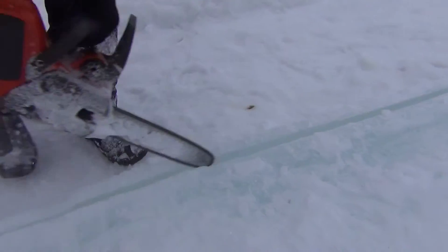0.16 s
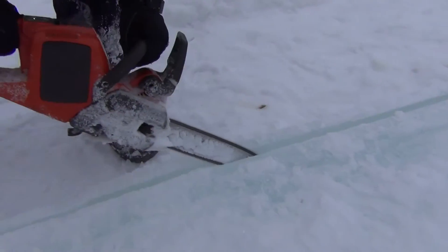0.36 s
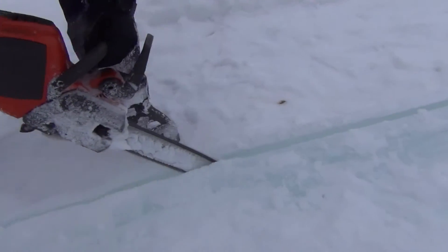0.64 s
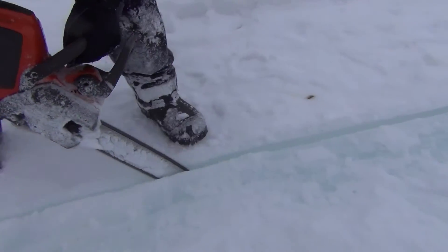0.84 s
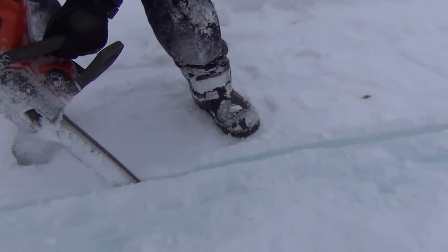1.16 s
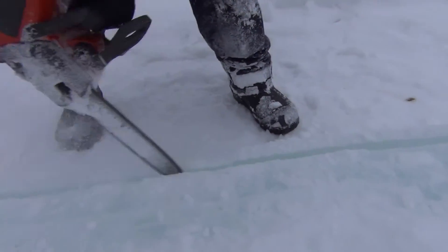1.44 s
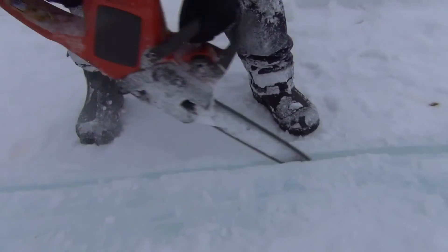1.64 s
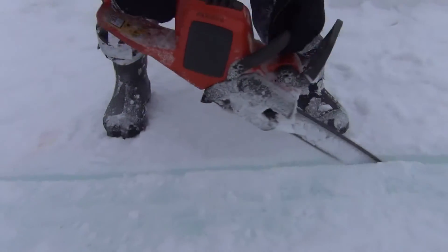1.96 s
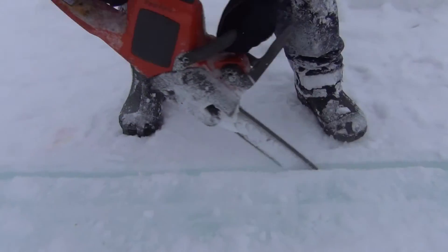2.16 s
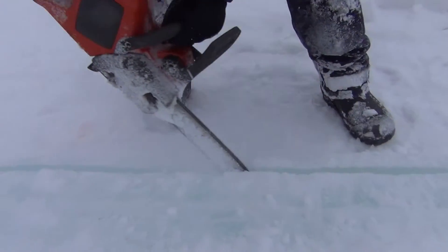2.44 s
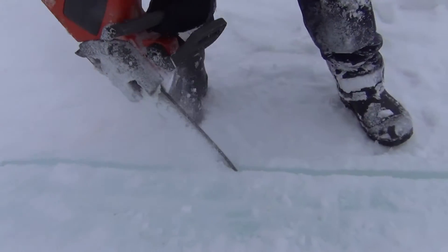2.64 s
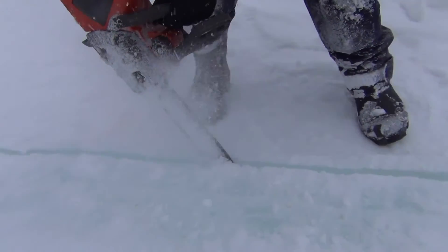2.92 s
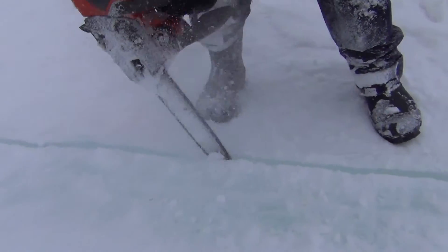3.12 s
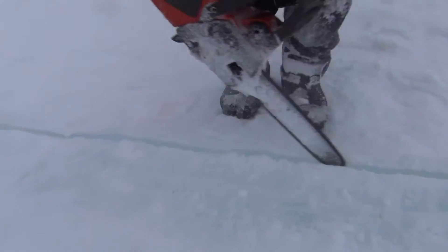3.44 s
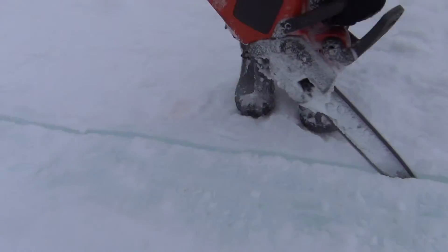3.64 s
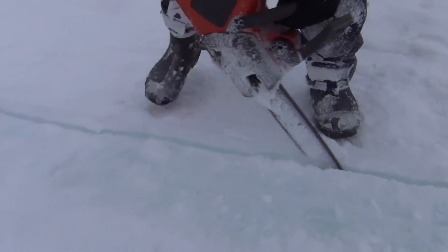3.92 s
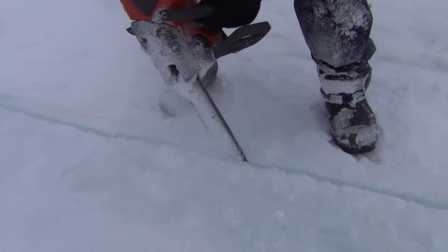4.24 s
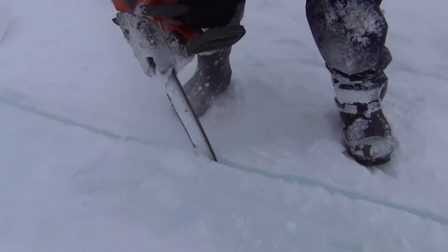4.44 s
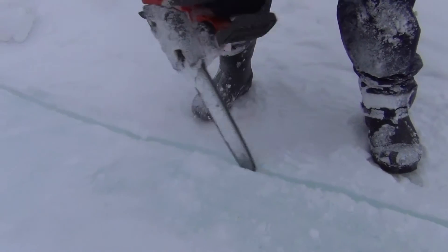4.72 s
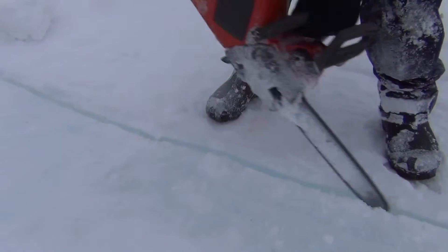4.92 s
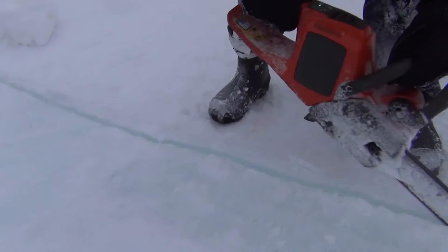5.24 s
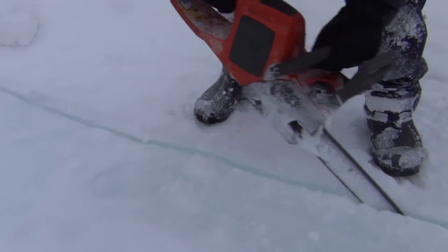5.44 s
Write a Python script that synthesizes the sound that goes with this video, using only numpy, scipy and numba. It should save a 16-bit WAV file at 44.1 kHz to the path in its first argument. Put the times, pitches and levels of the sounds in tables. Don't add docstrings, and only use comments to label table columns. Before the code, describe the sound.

Outdoors on snowy ice, a saw chain screams continuously while its cutters rasp through a slot. The bar hums more strongly in bites, chips spray as crackling hiss, and a few dull knocks are buried in the roar. Soft wind thumps hit the nearby stereo camera microphone; the sound is dry, bright and nearly central.

```python
import sys
import numpy as np
from scipy import signal
from scipy.fft import rfft, irfft
from scipy.io import wavfile
from scipy.ndimage import uniform_filter1d, map_coordinates
from numba import njit

SR = 44100
rng = np.random.default_rng(int(sys.argv[2]) if len(sys.argv) > 2 else 0)


def voltage_ratio(decibels):
    exponent = np.asarray(decibels, float) / 20
    return 10 ** exponent


def to_wav(sig):
    pcm = np.clip(np.atleast_2d(sig), -1, 1) * 32767
    pcm = np.round(pcm).astype(np.int16)
    wavfile.write(sys.argv[1], SR, pcm.T)


N = 245637
STRIKES_PER_TURN = 12


def level(x, db):
    return x * voltage_ratio(db) / np.sqrt(np.mean(x ** 2))


def columns(table):
    s, *rest = np.transpose(table)
    return [np.interp(np.arange(N) / SR, s, c) for c in rest]


def holds(table):
    attack_s, release_s = 0.063, 0.038
    t = np.arange(N) / SR
    lifts = []
    for start_s, length_s, lift_db in table:
        rise = (t - start_s) / attack_s + 0.5
        fall = (start_s + length_s - t) / release_s + 0.5
        lifts.append(lift_db * np.clip(np.minimum(rise, fall), 0, 1))
    return np.max(lifts, axis=0)


def swing(x):
    return x - x.mean()


def glide(x):
    glide_s = 0.13
    return uniform_filter1d(x, int(glide_s * SR))


def walk(rate_hz):
    k = int(SR / rate_hz)
    steps = np.repeat(rng.standard_normal(N // k + 1), k)
    return 1.3 * uniform_filter1d(uniform_filter1d(steps, k), k)[:N]


def colour(x, shape):
    hz, db = np.transpose(shape)
    f = np.maximum(np.arange(N // 2 + 1) * SR / N, 1)
    return irfft(rfft(x) * voltage_ratio(np.interp(np.log(f), np.log(hz), db)), N)


@njit
def svf(x, hz, width_hz):
    y, band, low = np.empty(len(x)), 0., 0.
    for i in range(len(x)):
        g, k = np.tan(np.pi * hz[i] / SR), width_hz / hz[i]
        v = (band + g * (x[i] - low)) / (1 + g * (g + k))
        band, low, y[i] = 2 * v - band, low + 2 * g * v, k * v
    return y


def ring(x, hz, width_hz):
    centre = hz * np.ones(N)
    return svf(svf(x, centre, 1. * width_hz), centre, 1. * width_hz)


def late(x, delay_s):
    return map_coordinates(x, [np.arange(N) - delay_s * SR], order=3, mode="mirror")


def puffs(table, width_s):
    t = np.arange(N) / SR
    return sum(voltage_ratio(db) * np.exp(-((t - s) / width_s) ** 2) for s, db in table)


# hz, density_db
WIND_SHAPE = [(8.8, -29), (15, 6.5), (44, 9.5), (189, -1.5), (228, -4.5), (265, -12), (300, -5), (390, -12),
              (660, -120)]
# start_s, length_s, lift_db
GUSTS = [(0, 0.89, 3.5), (1.05, .14, 1), (1.29, 0.32, 3), (1.9, 0.32, 3.5), (2.35, .23, 3),
         (2.72, 0.082, 3), (2.98, 0.56, 3.5), (3.7, 0.12, 4), (3.96, 0.68, 4), (4.73, .35, 3),
         (5.3, .35, 3)]
# time_s, peak_db
PUFFS = [
    (0.324, -41),
    (0.864, -45),
    (2.529, -66),
    (2.747, -39),
    (3.061, -43),
    (3.993, -44),
    (4.069, -47),
    (4.392, -39),
    (4.619, -63.5),
    (5.411, -39),
]
# time_s, peak_db
CROSS_PUFFS = [(.078, -54), (.328, -46), (.529, -46), (1.126, -56), (1.301, -51), (2.046, -55),
               (2.664, -54), (2.877, -56), (2.997, -49), (3.341, -52), (3.464, -50), (3.884, -55),
               (4.395, -46), (5.35, -54), (5.417, -49), (5.485, -54)]


def wind():
    gust = voltage_ratio(-64.5 + holds(GUSTS) - 0.5 * walk(5.08) + 0.82 * walk(26.74))
    mid, side = (gust * level(colour(rng.standard_normal(N), WIND_SHAPE), 0) for _ in range(2))
    mid = mid + voltage_ratio(-3.0) * late(puffs(PUFFS, width_s=0.001), 0.0032)
    side = side + voltage_ratio(11) * puffs(CROSS_PUFFS, width_s=0.0012)
    return mid * voltage_ratio(np.array([[1.1], [-1.1]])) + 0.27 * side * np.array([[1], [-1]])


# time_s, strike_hz
SPEED = [(0.0, 940), (0.6, 927), (1.1, 942), (1.32, 927), (1.43, 957), (1.86, 919), (2.29, 920),
         (2.39, 936), (2.64, 916.6), (2.65, 934.6), (3.1, 934.5), (3.16, 954), (3.27, 911.6), (4.0, 918.7),
         (4.03, 914), (4.34, 927.3), (5.2, 930.7), (5.57, 916)]
# free_s, drag_s, sag_hz
SNAGS = [
    (.66, 0.096, 6.2),
    (1.18, 0.054, 8.8),
    (2.29, .1, 7.1),
    (3.96, 0.036, 9.7),
    (4.12, 0.09, 9.3),
    (4.21, 0.0501, 16),
    (4.63, 0.15, 11.5),
    (4.88, 0.11, 8.1),
    (5.38, 0.048, 8.5),
]


def chain_speed():
    spring_s, overshoot, wander_hz = 0.04026, 0.807, 1.497
    t = np.arange(N) / SR
    snags = np.zeros(N)
    for free_s, drag_s, sag_hz in SNAGS:
        sag = -np.clip(1 - (free_s - t) / drag_s, 0, 1)
        rebound = overshoot * np.exp(-np.abs(t - free_s) / spring_s)
        snags += sag_hz * np.where(t < free_s, sag, rebound)
    return columns(SPEED)[0] + uniform_filter1d(snags, size=800) + wander_hz * walk(14)


def chopped(turns, depth, flicker_db, grit_db):
    gate = 1 + depth * np.cos(2 * np.pi * STRIKES_PER_TURN * turns)
    grit = voltage_ratio(grit_db * walk(150) + flicker_db * walk(11))
    return gate * grit * rng.standard_normal(N)


def partial(turns, multiple, db, wobble, flutter_db):
    angle = 2 * np.pi * multiple * turns + wobble * walk(60)
    return np.sqrt(2) * voltage_ratio(db + flutter_db * walk(45)) * np.sin(angle + 2 * np.pi * rng.random())


def throb(turns, depth_db):
    laps_per_turn = 0.27
    return voltage_ratio(depth_db * np.sin(2 * np.pi * laps_per_turn * turns + 2.7 * walk(8)))


def repeating(x, strike_hz, likeness):
    return x + sum(likeness ** k * late(x, 2 * k / strike_hz) for k in range(1, 4))


# delay_ms, drift_ms, strength_db
BOUNCES = [
    (1.302, 0.192, -15.5),
    (2.9, 0.303, -10.5),
    (5.1, 0.378, -13.5),
]


def bounced(x):
    return x + sum(voltage_ratio(db) * late(x, (ms + drift_ms * walk(2.5)) / 1000) for ms, drift_ms, db in BOUNCES)


# start_s, length_s, depth_db
SHADES = [
    (-.05, 0.93, 6),
    (.75, .5, 5),
    (1.25, .43, 4),
    (2.45, 0.36, 2.5),
    (2.9, .3, -5),
    (3.2, 0.54, 1),
    (3.9, 0.496, -0.5),
    (4.5, 0.31, -5),
    (4.85, 0.36, 3),
]


def shaded(x):
    return x - (1 - voltage_ratio(-holds(SHADES))) * ring(x, hz=4700, width_hz=1300)


# time_s, nearness_db, cover_turn_db, whistle_hz
POSE = [(0.0, -35, -22, 9150), (0.11, -32, -12, 8630), (0.4, -37, -1, 8900), (0.96, -34.5, -3, 8500),
        (1.3, -33, -7.5, 8900), (1.44, -32, -13, 8480), (1.78, -36, 1, 8460), (1.94, -42, 2.5, 8790),
        (2.13, -36.5, 1.5, 8800), (2.59, -32.5, -6, 8750), (3.57, -32.5, -8.5, 8464),
        (3.71, -31.5, -13, 8490), (3.86, -34, -3, 8890), (4.96, -30.5, -14, 8365), (5.18, -33, -18, 8500),
        (5.26, -38, -5.5, 8910), (5.55, -33, -7, 8650), (5.57, -39, 2, 8630)]
# time_s, density_db, fineness_db
SPRAY = [(0.0, -41, -11), (0.42, -39, -6), (0.91, -38, -5.5), (1.18, -41.5, -4), (1.78, -39, -12),
         (1.8, -42, -11), (2.14, -39.5, -11), (2.7, -41, -4), (3.04, -38.5, -11), (3.24, -43.5, -5),
         (3.38, -36.5, -16), (3.4, -42, -6), (3.52, -41.5, -13), (4.58, -39.5, -6.5), (4.75, -42.5, -9),
         (4.89, -42.5, -3), (5.21, -45.5, -9), (5.57, -41, -7)]
# start_s, length_s, lift_db
BURSTS = [
    (.37, .1, 1),
    (.57, 0.098, 2.5),
    (.72, 0.11, 1),
    (.9, 0.087, 2),
    (1.06, 0.054, 3),
    (2.05, 0.15, 2.5),
    (2.48, 0.089, 1),
    (3.33, 0.093, 3),
    (3.6, 0.083, 4),
    (4.25, 0.091, 2),
]
# start_s, length_s, lift_db
SURGES = [
    (.1, 0.14, 1.5),
    (1.36, 0.32, 2),
    (2.88, .1, 0),
    (3.25, 0.42, 0.5),
    (4.3, 0.086, 0.5),
    (4.6, .1, 1.5),
    (4.82, 0.19, 1.5),
    (5.05, 0.14, 0.5),
]


def hiss_controls():
    near_db, turn_db, centre_hz = map(glide, columns(POSE))
    near_db, turn_db = swing(near_db), swing(turn_db)
    chips_db, fine_db = (swing(glide(c)) for c in columns(SPRAY))
    burst_db = holds(BURSTS)
    whistle_db = -33 + holds(SURGES) + 0.86 * near_db - 0.064 * turn_db
    lower_db = -38 + burst_db + 1.75 * chips_db - 0.31 * near_db
    upper_db = -39 + 1.18 * near_db + 1.19 * turn_db
    top_db = -47 + 0.55 * burst_db + 0.58 * walk(8) + 0.05 * near_db + 0.93 * (chips_db + fine_db)
    return centre_hz, whistle_db, lower_db, upper_db, top_db


# time_s, lower_hz, upper_hz
FLANKS = [(0, 7200, 10000), (.4, 7050, 10400), (1.0, 7000, 10700), (1.55, 6900, 10100), (1.8, 6900, 10700),
          (2.2, 6900, 10950), (2.6, 6700, 10200), (3.4, 6900, 10600), (3.72, 7150, 10100),
          (3.88, 6860, 10600), (4.3, 6560, 10590), (4.7, 6700, 11200), (5.2, 6940, 10600),
          (5.57, 6960, 10700)]


def air(turns, centre_hz, whistle_db, lower_db, upper_db, top_db):
    lower_hz, upper_hz = map(glide, columns(FLANKS))
    whistle = level(ring(chopped(turns, 0.45, 0.4, 0.3), centre_hz, 2210), whistle_db - 0.1)
    lower = level(ring(bounced(chopped(turns, 0.54, 0.84, 1.8)), lower_hz, 2200), lower_db - 3.0)
    upper = level(ring(chopped(turns, 0.37, 0.86, 0.79), upper_hz, 4200), upper_db - 0.6)
    top = level(ring(chopped(turns, 0.4, 0.99, 0.72), 13200, 11000), top_db + 0.3)
    return whistle + lower + upper + top


# time_s, left_minus_right_db
SWAY = [(0, 2.5), (.2, 0.7), (.95, 0.7), (1.3, 1.6), (1.55, 1), (1.7, 0.6), (2.55, 0.7), (2.7, 1),
        (3.25, 1), (3.45, -0.4), (3.65, -1.5), (3.85, 0.2), (4.0, 1.2), (4.2, 0.1), (4.6, 1), (4.85, 0.7),
        (5.05, -2), (5.35, -2.5), (5.57, -0.5)]
# hz, gain_db
SWAY_LEFT = [(5000, 7), (6500, 5), (7800, 2), (9000, 1.5), (10200, -1), (12500, 6), (15000, 3)]
SWAY_RIGHT = [(5000, -6), (6500, 8), (8000, 5), (9500, 2), (11000, 5), (12500, -8), (15000, -14)]


def swaying(hiss):
    pan = voltage_ratio(columns(SWAY)[0])
    share = (pan - 1) / (pan + 1)
    return np.maximum(share, 0) * colour(hiss, SWAY_LEFT) + np.minimum(share, 0) * colour(hiss, SWAY_RIGHT)


# hz, density_db
BED_SHAPE = [(88, -60), (150, -29), (366, -20.5), (591, -6.5), (713, -14.5), (922, -5), (1000, -16),
             (1230, -13), (1710, -3.5), (1830, 1), (2130, -5), (2760, -13), (4690, -8), (9000, -5.5),
             (11700, -39), (19800, -120)]


def bed(turns, spray_db):
    noise = colour(chopped(turns, 0.14, 0.74, 1.52), BED_SHAPE)
    return level(noise, -38 + 0.096 * swing(spray_db))


def cracks(rate_hz, spread_db):
    chance, size = rng.random(N), np.minimum(rng.exponential(size=N), 3)
    return -1. * (chance < rate_hz / SR) * voltage_ratio(spread_db * size)


def sputter(turns):
    angle = np.pi * STRIKES_PER_TURN * turns + 0.41 * walk(90)
    return np.maximum(1 + 0.27 * np.cos(angle) + 0.14 * np.cos(angle / 2), 0)


# start_s, length_s, level_db, centre_hz
CATCHES = [(0.053, 0.13, -48, 3350), (.28, 0.19, -46, 3900), (.4, 0.36, -53, 1390),
           (0.497, 0.26, -48, 3600), (0.513, 0.092, -43, 2020), (1.093, 0.13, -53, 3300),
           (1.885, 0.29, -47, 3500), (2.28, 0.17, -54, 3210), (2.4, 0.18, -47, 6500),
           (2.45, 0.64, -49, 2890), (2.677, 0.098, -55, 3750), (2.817, .26, -44, 6500),
           (3.45, 0.15, -61, 4137), (3.55, 0.16, -48, 3300), (4.043, 0.091, -48, 3400),
           (4.44, .14, -53, 1400), (4.5, 0.16, -56, 6300), (4.947, .12, -62, 3713),
           (5.08, 0.17, -45.5, 3310), (5.294, 0.33, -48.5, 3150), (5.4, .16, -51, 1386)]


def catches(grind):
    total = np.zeros(N)
    for start_s, length_s, level_db, hz in CATCHES:
        total += holds([(start_s, length_s, 1)]) * level(ring(grind, hz, 0.13 * hz), level_db)
    return total


# start_s, length_s, lift_db
BITES = [(.08, 0.094, 1), (.39, 0.22, 11), (.62, 0.82, 15.5), (1.47, 0.044, 19), (1.9, 0.13, 8),
         (2.08, 0.42, 19.5), (2.48, 0.24, 14.5), (2.66, 0.12, 8), (2.95, 0.2, 11), (3.7, .25, 7.5),
         (3.94, 0.273, 18.5), (4.24, .46, 21), (5.28, .4, 18), (2.0, .1, 7), (4.68, .1, 6), (5.2, .1, 6)]
# time_s, pressure_db, brightness_db, depth_db
EFFORT = [(0.0, -45.5, 5.5, 8.5), (0.39, -44.5, 2, -10), (0.4, -41, -1, -6.5), (0.65, -44.5, 2, -4),
          (1.33, -42, 0.5, -5), (1.58, -44, 1.5, -5), (1.89, -43, 2, -2), (2.33, -42.5, 0, -4),
          (2.47, -41.5, 2, -2), (3.15, -42, -1, -6), (3.43, -46.5, 5, -2.5), (4.47, -38, -2.5, -1),
          (4.69, -40, -5, -9), (5.0, -44.5, 1.5, -1), (5.14, -51, 10, 5), (5.18, -45.5, 4.5, 0.5),
          (5.5, -41.5, -1, -3.5), (5.57, -43.5, 3.5, 2)]


def grind_levels():
    bite_db = holds(BITES)
    push_db, bright_db, deep_db = map(swing, columns(EFFORT))
    hum_db = -68.5 + bite_db
    low_db = -48.5 + 0.18 * bite_db + 1.03 * (push_db + deep_db)
    middle_db = -42.5 + 1.27 * push_db
    upper_db = -40.5 + 1.95 * (push_db + bright_db)
    return hum_db, low_db, middle_db, upper_db


# turn_multiple, over_hum_db
CUTTERS = [(5.87, -8.5), (6.13, -3.5), (6.65, -13.5)]
# start_s, length_s, lift_db
THRUMS = [
    (.55, .9, 6),
    (2.1, 0.31, 10.5),
    (2.4, 0.29, 16),
    (4.0, 0.32, 1),
    (4.55, 0.12, 13.5),
    (5.3, .3, 6),
]
# turn_multiple, over_middle_db
TEETH = [(18, -18.5), (30, -11), (42, -40), (54, -22), (60, -16), (66, -17.5)]
# start_s, length_s, lift_db
EVEN = [
    (.3, 0.57, 5),
    (.85, 0.46, 6),
    (1.82, 0.42, 5.5),
    (2.4, 1, 3.5),
    (3.75, .3, 5),
    (4.2, .8, 1.5),
]


def cutting(turns, strike_hz, spray_db):
    hum_db, low_db, middle_db, upper_db = grind_levels()
    hum = level(ring(chopped(turns, 0, 0.98, 0.69), 480, 154.0), hum_db - 7.5)
    lines = sum(partial(turns, m, hum_db + db, wobble=0.24, flutter_db=1.5) for m, db in CUTTERS)
    thrum = partial(turns, 3, -77 + holds(THRUMS), wobble=0.33, flutter_db=3.0)
    even_db = holds(EVEN)
    teeth = sum(partial(turns, m, middle_db + db - 2 + even_db + 1.1 * walk(4.38), wobble=0.63, flutter_db=1.5)
                for m, db in TEETH)
    grind = level(chopped(turns, 0.087, 0.72, 0.83), 0) + level(cracks(rate_hz=1300, spread_db=3.0), -3)
    grind = bounced(sputter(turns) * repeating(grind, strike_hz, likeness=0.05))
    body = level(ring(grind, 760, 460), 0.53 * hum_db + 0.43 * low_db - 7.0)
    low = level(ring(grind, 1340, 1340), low_db - 3.5)
    middle = level(ring(grind, 2540, 1380), middle_db + 0.17)
    upper = level(ring(grind, 3442 - 40 * swing(upper_db - middle_db), 2360), upper_db - 0.8)
    spray = level(ring(grind, 5400, 3200), 0.39 * upper_db + 0.5 * spray_db - 15.5)
    return hum + lines + thrum + teeth - body + low - middle + upper - spray + catches(grind)


# hz, gain_db
VALLEY = [(4150, -0.5), (4450, -3.5), (4900, -1.5), (5150, -1.5)]


def scraping(turns, strike_hz, spray_db):
    rasp = colour(cutting(turns, strike_hz, spray_db) + bed(turns, spray_db), VALLEY)
    return shaded(rasp * voltage_ratio(0.25 * walk(7) + 0.76 * walk(70)))


# time_s, peak_db, ring_hz
KNOCKS = [
    (.41, -51, 410),
    (.55, -60, 368),
    (2.49, -43, 705),
    (4.2, -46.5, 678),
]


def knocks():
    t = np.arange(N) / SR
    total = np.zeros(N)
    for time_s, peak_db, hz in KNOCKS:
        age_s = np.maximum(t - time_s, 0)
        total += voltage_ratio(peak_db) * age_s / 0.0076 * np.exp(1 - age_s / 0.009) * np.sin(2 * np.pi * hz * age_s)
    return total


PARTIALS_DB = [-59.5, -38.5, -55.5, -64]
# start_s, length_s, lift_db
TAUT = [(-.05, 0.25, 11.5), (.34, 0.24, 12), (.52, 0.37, 15.5), (.95, 0.31, 6), (1.22, 0.19, 13.5),
        (1.44, 0.18, 6), (1.62, 0.32, -3), (1.98, 0.085, 10), (2.12, 0.23, 9), (2.3, 0.4, 14),
        (3.12, 0.59, 9), (3.7, 0.2504, 5), (3.95, 0.1, 17.5), (4.06, 0.075, 17), (4.2, 0.42, 15.5),
        (4.63, 0.072, 23), (4.7, 0.37, 11.5), (5.28, .4, 18.5), (.88, .6, 7), (2.68, .1, 3), (4.1, .12, 6),
        (5.03, .1, 3)]
# start_s, length_s, drop_db
SLACK = [(.39, 0.28, 16), (.62, 0.32, 9), (.8, 0.38, 3.5), (1.31, 0.049, 16), (1.42, 0.11, 4),
         (1.85, .2, 4.5), (2.05, 0.069, 28), (2.2, 0.083, 7), (2.52, 0.083, 6.5), (2.59, 0.066, 14),
         (2.66, 0.463, 6), (3.1, 0.67, 1), (3.6, 0.26, 4), (4.0, 0.18, 3.5), (4.47, 0.17, 2),
         (4.9, 0.68, 1), (5.03, .33, 4)]
# start_s, length_s, lift_db
SINGING = [(.05, .24, 16.5), (.26, 0.24, 11.5), (.4, 0.4, 13), (1.1, .1, 14), (1.17, .22, 14.5),
           (1.93, 0.084, 10), (2.43, 0.14, 12), (2.52, 0.16, 10), (2.75, 0.5, 9), (3.88, 0.048, 14),
           (4.0, 0.11, 12.5), (4.22, 0.058, 14), (4.26, 0.11, 9), (4.42, .1, 9), (4.52, 0.2, 14),
           (4.68, 0.16, 12), (4.96, 0.2, 10), (5.4, 0.23, 10)]
# start_s, length_s, lift_db
SQUEAKS = [(-.05, 0.11, 14), (.16, 0.22, 12), (.58, 0.36, 10), (1.9, 0.14, 17), (2.68, 0.18, 14),
           (2.43, 0.13, 3), (3.5, 0.13, 14), (4.03, .26, 12), (4.34, 0.17, 1), (4.69, 0.36, 14),
           (5.16, 0.17, 13)]


def strike_levels():
    lifts = holds(TAUT), -holds(SLACK), holds(SINGING), holds(SQUEAKS)
    return [db + lift for db, lift in zip(PARTIALS_DB, lifts)]


# turn_multiple, level_db
SHAFT = [(2, -82), (4, -73), (9, -68), (10, -63), (14, -62.5), (15, -64), (26, -60), (40, -58)]
# start_s, length_s, lift_db
HARD = [
    (.9, 0.49, 5),
    (2.3, 0.37, 3.5),
    (2.8, .4, 2),
    (4.2, 0.34, 1),
]


def whine(turns):
    strikes = np.zeros(N)
    for k, db in enumerate(strike_levels()):
        wobble = 0.24 + 0.082 * k + 0.13 * k ** 2
        flutter_db = 1.3 - 0.62 * k + 0.52 * k ** 2
        strikes += partial(turns, STRIKES_PER_TURN * (k + 1), db, wobble, flutter_db)
    hard_db = holds(HARD)
    shaft = sum(partial(turns, m, db + hard_db + 2.0 * walk(7.7), wobble=0.93, flutter_db=3.0)
                for m, db in SHAFT)
    return strikes + shaft


# time_s, left_minus_right_db
LEFT = [(0, 1.5), (1.1, 2), (1.75, 2.5), (1.95, 0.5), (3.6, 0.65), (3.9, 0.37), (5.57, 0.3)]
# hz, gain_db
LEAN = [(100, -23), (900, 4), (1300, -3), (1900, -2), (2400, -22), (3700, -15), (4600, 10), (5600, -4),
        (7000, -20)]
# hz, gain_db
STEADY_LEAN = [(100, -34), (520, -19.5), (800, -37), (1720, -77), (1850, -23.5), (1980, -25)]


def leaning(saw):
    left = voltage_ratio(np.maximum(columns(LEFT)[0], 0))
    return (left - 1) / (left + 1) * colour(saw, LEAN) + colour(saw, STEADY_LEAN)


def scene():
    strike_hz = chain_speed()
    turns = np.cumsum(strike_hz) / SR / STRIKES_PER_TURN
    centre_hz, whistle_db, lower_db, upper_db, top_db = hiss_controls()
    hiss = air(turns, centre_hz, whistle_db, lower_db, upper_db, top_db)
    hiss = shaded(repeating(hiss, strike_hz, likeness=0.097)) * voltage_ratio(-0.32)
    rasp = scraping(turns, strike_hz, spray_db=lower_db)
    lap, shake = throb(turns, depth_db=0.5), voltage_ratio(0.4 * walk(18))
    saw = lap * whine(turns) + lap ** 1.9 * shake * rasp + knocks()
    sideways = leaning(saw) + swaying(hiss)
    return saw + hiss + sideways * np.array([[1], [-1]]) + wind()


def band_limit(x):
    return signal.sosfilt(signal.butter(12, 16720, fs=SR, output="sos"), x)


def record(dry):
    cut = signal.ellip(18, 0.2, 90, 15800, fs=SR, output="sos")
    mix = signal.sosfilt(cut, dry)
    return band_limit(mix)


dry = scene()
out = record(dry)
to_wav(out)
```